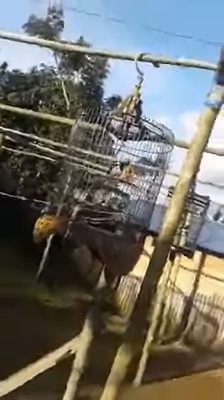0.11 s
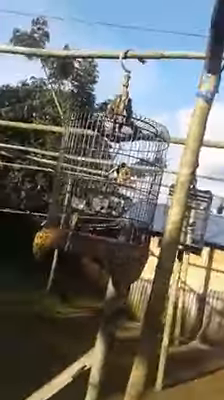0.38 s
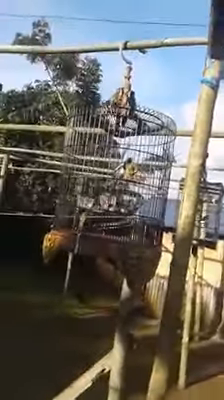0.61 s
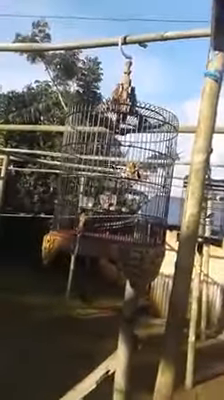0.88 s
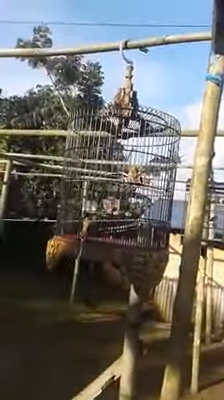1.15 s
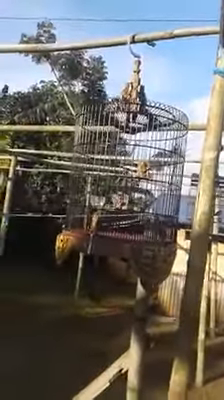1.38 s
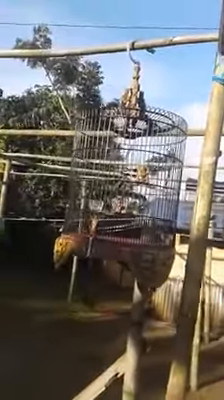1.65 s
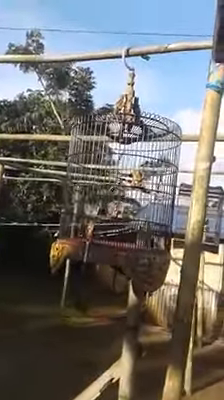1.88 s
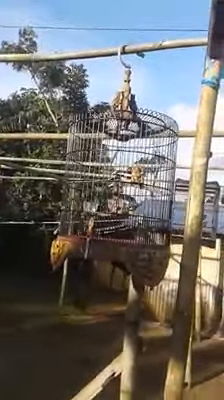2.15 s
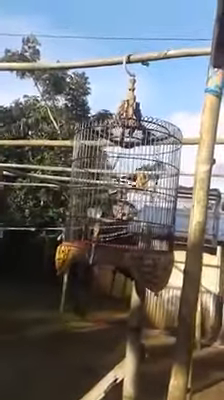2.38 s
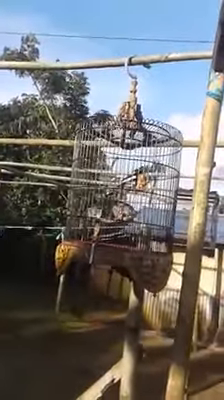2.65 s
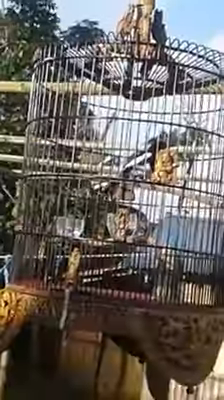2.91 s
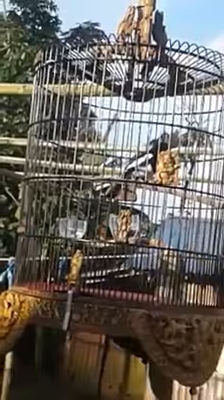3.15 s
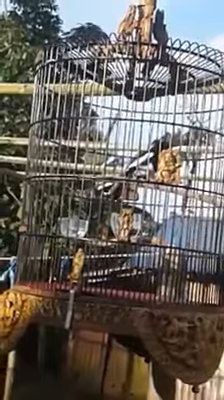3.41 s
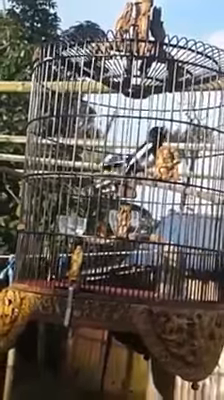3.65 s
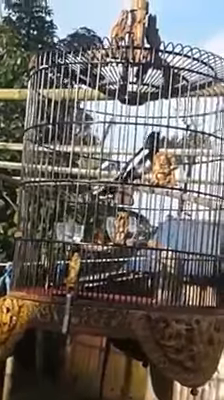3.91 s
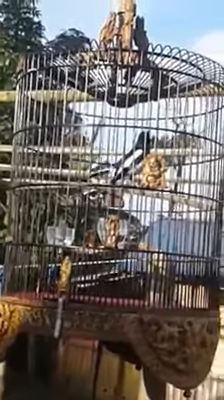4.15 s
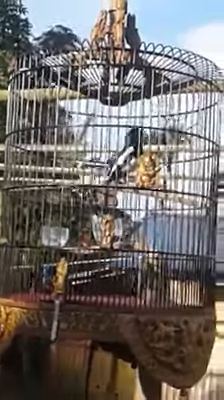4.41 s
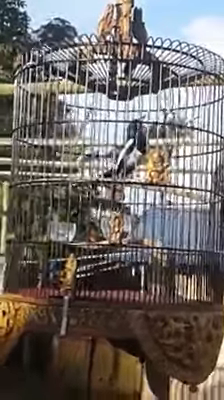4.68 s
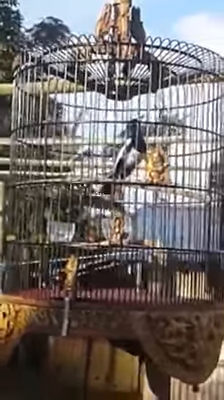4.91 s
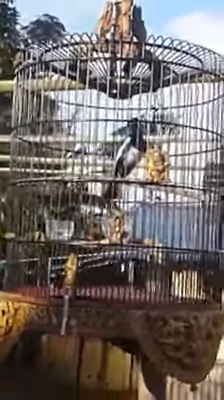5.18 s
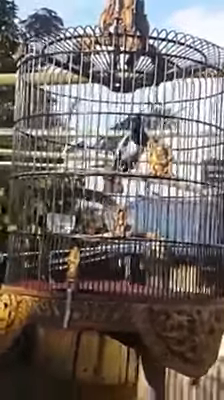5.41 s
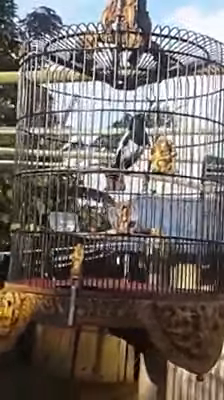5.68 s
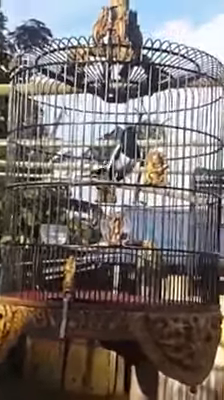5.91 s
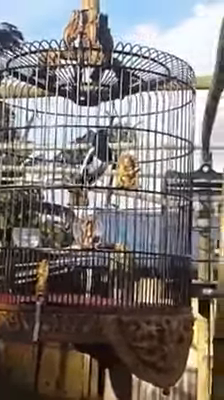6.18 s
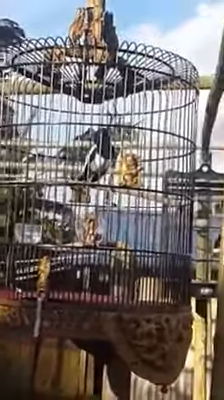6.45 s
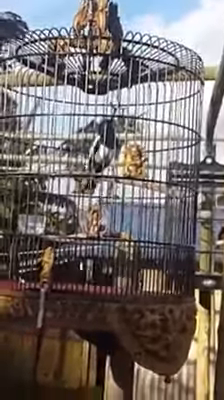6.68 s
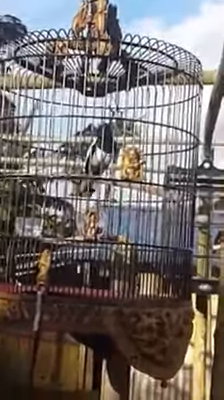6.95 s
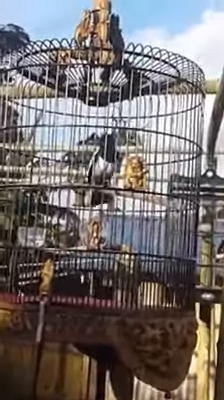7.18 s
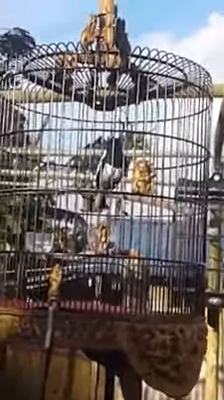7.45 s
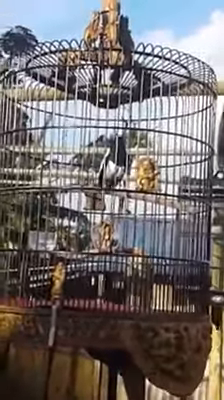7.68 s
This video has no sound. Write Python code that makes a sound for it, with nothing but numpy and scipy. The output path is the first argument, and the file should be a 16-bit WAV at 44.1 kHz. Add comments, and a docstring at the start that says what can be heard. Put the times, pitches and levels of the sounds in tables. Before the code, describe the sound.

Close outdoor phone sound of one bird in a hanging cage, singing clear, bending whistles mixed with hoarse scrapes and short trills. It begins with a brief noisy chirp and rather softer phrases, then becomes brighter and more forceful. Nearby posts and fences return a short diffuse echo. Faint wing flutter, cage ticks and far motor drones sit underneath; a few low engine puffs close it. Mono, with grainy, artificial-sounding highs.

```python
"""In a yard whose fences throw the song back, a caged songbird whistles fast slurs, often two notes at once.
The song is built of gliding sines with weak overtones and rasping air; filtered noise makes the wings'
rustles and the traffic's hum, decaying bursts make the cage's ticks and a small engine's putter at the end.
A phone hears it in mono and rebuilds its treble from shifted copies of the lower band and noise."""
import sys
import numpy as np
from scipy import signal
from scipy.fft import rfft, irfft
from scipy.io import wavfile
from scipy.ndimage import uniform_filter1d, minimum_filter1d, map_coordinates

SR = 44100
rng = np.random.default_rng(int(sys.argv[2]) if len(sys.argv) > 2 else 0)


def dump_mix(stems):
    """Bounce the given channels to the path in sys.argv[1] as a 16-bit WAV at rate SR."""
    frames = np.atleast_2d(stems).T  # one column per channel
    limited = np.clip(frames, -1, 1)  # hard clip at full scale
    pcm = np.round(limited * 32767).astype(np.int16)
    wavfile.write(sys.argv[1], SR, pcm)


def ratio_of_db(decibels):
    """Turn decibels (scalar or array-like) into linear amplitude factors; 0 dB maps to 1."""
    return 10 ** (np.asarray(decibels, float) / 20)


N = 344862  # samples

# spectral shape of turbulent air, in the rasp of the voice, wing rustles and claw cracks:
# (f/Hz, relative level per Hz/dB)
AIR_SPECTRUM = [(1200, -27), (2000, -6), (4000, 14.5), (6000, 9.5), (8000, -16.5), (11000, 8),
                (13000, -21.5), (15500, -11)]


def unit(x):
    """Normalisation by mean power: the rms becomes 1."""
    return x / np.sqrt(np.mean(x ** 2) + 1e-20)


def along(points, hz):
    """Interpolation on a logarithmic frequency axis, through (f/Hz, value) points."""
    f, value = np.transpose(points)
    return np.interp(np.log(hz + 1), np.log(f + 1), value)


def wobble(rate):
    """Band-limited random modulation: a smooth curve through `rate` random knots a second."""
    knots = rng.standard_normal(int(N * rate / SR) + 4)
    return map_coordinates(knots, [np.arange(N) * rate / SR])


def noise(spectrum):
    """Spectral shaping: white noise weighted in frequency, at rms 1."""
    hz = np.fft.rfftfreq(N, 1 / SR)
    white = rfft(rng.standard_normal(N))
    return unit(irfft(white * ratio_of_db(along(spectrum, hz)), N))


def add(track, s, sound):
    """Superposition: the sound joins the track at time s, cut at the track's end."""
    part = track[round(s * SR):][:len(sound)]
    part += sound[:len(part)]


def bird():
    """Source superposition: song, flicks and a farther bird's notes, fluttering a little in strength."""
    # whistled notes, with a rough high hiss near 7.8 kHz and a short noisy start near 5 kHz:
    # (voice, [(t/s, f/Hz, level before flutter/dB), ..])
    song_parts = [ ("reedy", [(0, 2950, -25), (.1, 2900, -43)]), ("airy", [(0, 5000, -12.5),
                  (.05, 4700, -56)]), ("bright", [(.168, 1670, -42), (.2, 2170, -40), (.215, 2180, -31),
                  (.26, 2220, -33), (.319, 2180, -45)]), ("clear", [(.178, 3000, -30), (.192, 2786, -21),
                  (.205, 2810, -24), (.215, 2800, -43), (.272, 2740, -37)]), ("airy", [(.24, 1950, -29),
                  (.262, 1410, -47)]), ("airy", [(.311, 2710, -28.5), (.333, 3170, -29.5)]),
                  ("bright", [(.325, 2650, -28), (.353, 2440, -24.5), (.429, 2440, -72)]),
                  ("airy", [(.507, 3060, -43), (.621, 3380, -30), (.68, 3350, -27.5), (.73, 3330, -53),
                  (.762, 3330, -35.5), (.785, 3350, -57)]), ("airy", [(.812, 3790, -24),
                  (.834, 3400, -31.5), (.876, 3110, -30), (.93, 3080, -26.5), (1.04, 3050, -44)]),
                  ("clear", [(1.062, 3780, -35.5), (1.095, 3850, -26.5), (1.19, 3766, -28.5),
                  (1.219, 3740, -20)]), ("rough", [(1.215, 3760, -21), (1.259, 4150, -24.5),
                  (1.317, 4420, -26.5), (1.439, 4400, -41)]), ("clear", [(1.485, 3050, -34.5),
                  (1.539, 3530, -14.5), (1.572, 3620, -27), (1.658, 3590, -31.5)]),
                  ("rough", [(1.59, 2960, -24), (1.656, 2450, -26.5), (1.698, 2440, -38)]),
                  ("airy", [(1.866, 2690, -32), (1.9, 2720, -27), (1.932, 2720, -28), (1.958, 3010, -20),
                  (1.98, 3200, -29), (2.03, 3385, -19), (2.075, 3380, -28.5), (2.199, 3320, -37)]),
                  ("bright", [(2.055, 1820, -48), (2.085, 2200, -27), (2.199, 2450, -27.5),
                  (2.311, 2380, -29.5), (2.462, 2090, -30), (2.53, 2020, -28.5), (2.548, 2000, -58)]),
                  ("clear", [(2.217, 2770, -27.5), (2.243, 3010, -20), (2.27, 3013, -26.5),
                  (2.31, 2970, -44), (2.36, 2940, -27), (2.44, 2920, -38), (2.55, 2896, -36.5),
                  (2.7, 2900, -26)]), ("clear", [(2.616, 2150, -37), (2.645, 2180, -22), (2.672, 2180, -26),
                  (2.702, 1880, -42), (2.735, 2150, -28.5), (2.765, 2180, -24.5), (2.82, 2200, -54)]),
                  ("airy", [(2.722, 4270, -27.5), (2.754, 3540, -21), (2.798, 3360, -18.5),
                  (2.863, 2900, -26.5), (2.885, 2330, -24.5), (2.949, 2390, -39)]),
                  ("clear", [(2.775, 1326, -55), (2.85, 1274, -50)]), ("harsh", [(2.87, 3120, -12),
                  (2.89, 2800, -30.5), (2.93, 2980, -29)]), ("rough", [(2.985, 3970, -29),
                  (3.003, 3240, -19), (3.035, 2460, -21.5), (3.075, 2360, -16), (3.119, 2390, -35)]),
                  ("hoarse", [(3.011, 3080, -31), (3.04, 3300, -26), (3.055, 3340, -36),
                  (3.11, 3260, -31.5)]), ("clear", [(3.07, 1300, -59), (3.15, 1300, -49)]),
                  ("clear", [(3.08, 955, -55), (3.14, 938, -48)]), ("rough", [(3.197, 2950, -14),
                  (3.213, 2470, -28.5), (3.283, 2130, -23), (3.312, 1740, -37), (3.36, 1384, -44),
                  (3.46, 960, -62)]), ("rough", [(3.24, 2450, -34), (3.265, 2655, -25),
                  (3.295, 2526, -24)]), ("hoarse", [(3.625, 3500, -48), (3.65, 3390, -21),
                  (3.67, 3310, -17.5), (3.696, 3060, -11), (3.74, 2777, -15.5), (3.77, 2450, -33),
                  (3.78, 2360, -44)]), ("harsh", [(3.646, 2110, -31.5), (3.769, 2440, -29)]),
                  ("rough", [(3.66, 4250, -32), (3.7, 3990, -24.5), (3.779, 3780, -25)]),
                  ("clear", [(3.851, 3160, -18), (3.867, 3180, -13.5), (3.895, 3270, -24),
                  (3.922, 3300, -9), (3.96, 3300, -16), (3.989, 3300, -30.5)]),
                  ("clear", [(4.031, 3300, -39), (4.06, 3100, -33), (4.17, 3105, -31.5), (4.212, 3210, -15),
                  (4.298, 3290, -36)]), ("clear", [(4.27, 4250, -42), (4.33, 4260, -22),
                  (4.46, 4330, -28)]), ("airy", [(4.452, 1800, -44), (4.49, 2300, -26.5),
                  (4.522, 2180, -31), (4.56, 2260, -21.5)]), ("hoarse", [(4.462, 3130, -25.5),
                  (4.485, 3290, -16.5), (4.53, 2940, -10.5), (4.584, 2730, -17.5), (4.62, 2530, -32)]),
                  ("rough", [(4.465, 4260, -27.5), (4.53, 4000, -24), (4.58, 4270, -31),
                  (4.63, 4030, -30.5)]), ("clear", [(4.572, 3710, -24), (4.6, 3720, -19),
                  (4.64, 3775, -23.5), (4.723, 3720, -16), (4.76, 3700, -29), (4.879, 3700, -60)]),
                  ("bright", [(4.785, 2590, -43.5), (4.805, 2750, -16.5), (4.849, 3030, -15.5),
                  (4.93, 3407, -14), (4.995, 3610, -14), (5.059, 3630, -14.5)]),
                  ("bright", [(4.9, 2300, -36), (4.935, 2454, -21.5), (5.007, 2660, -17),
                  (5.076, 2677, -23.5), (5.12, 2740, -38.5), (5.145, 2766, -20.5), (5.184, 2870, -21.5),
                  (5.218, 2730, -19), (5.238, 2390, -17)]), ("rough", [(5.1, 3010, -50), (5.132, 3310, -19),
                  (5.168, 3360, -44)]), ("bright", [(5.15, 3630, -48), (5.18, 3930, -25),
                  (5.246, 3960, -10.5), (5.272, 3940, -15.5), (5.31, 3330, -13), (5.35, 3120, -16),
                  (5.4, 3000, -32)]), ("bright", [(5.312, 2500, -71), (5.375, 2560, -21.5),
                  (5.43, 2550, -27)]), ("clear", [(5.436, 3010, -28), (5.45, 2520, -19),
                  (5.519, 2250, -25.5), (5.569, 2110, -28.5)]), ("clear", [(5.501, 2740, -19.5),
                  (5.571, 2780, -9), (5.599, 2770, -9.5)]), ("reedy", [(5.681, 2750, -48),
                  (5.705, 2770, -23), (5.8, 2820, -16.5), (5.92, 2770, -15.5), (5.96, 2750, -21),
                  (6.048, 2700, -26.5)]), ("rough", [(5.85, 7700, -47), (5.99, 7940, -28), (6.1, 7420, -44),
                  (6.185, 7970, -27.5)]), ("harsh", [(6.015, 5100, -14), (6.036, 4400, -22),
                  (6.048, 3677, -2.5), (6.064, 3050, -10.5), (6.098, 2760, -22.5), (6.15, 2490, -27),
                  (6.2, 1820, -31)]), ("rough", [(6.03, 5200, -26), (6.06, 3880, -27), (6.1, 3300, -24.5),
                  (6.16, 2970, -40)]), ("buzzy", [(6.338, 870, -61.5), (6.354, 918, -43), (6.372, 955, -50),
                  (6.399, 884, -68)]), ("bright", [(6.525, 2040, -38), (6.551, 2270, -21),
                  (6.579, 2480, -16.5), (6.61, 2420, -47), (6.679, 2470, -42)]),
                  ("airy", [(6.687, 2650, -20), (6.703, 2770, -17), (6.747, 3070, -19),
                  (6.765, 3530, -19.5)]), ("airy", [(6.701, 4040, -34.5), (6.733, 4190, -33.5),
                  (6.769, 4200, -20.5)]), ("bright", [(6.777, 4080, -6.5), (6.896, 3980, -11.5),
                  (6.94, 4040, -13), (6.968, 4058, -8.5), (6.985, 4190, -14.5), (7.02, 4370, -14),
                  (7.078, 4430, -28), (7.1, 4400, -58)]), ("shrill", [(7.175, 4650, -29.5),
                  (7.202, 5340, -22.5), (7.224, 5940, -14.5), (7.26, 6150, -28)]),
                  ("shrill", [(7.222, 4690, -23), (7.254, 4640, -13), (7.273, 3570, -17.5),
                  (7.298, 3510, -26), (7.335, 3500, -38)]), ("harsh", [(7.25, 3030, -32),
                  (7.275, 2400, -33.5), (7.325, 2400, -41)]), ("hoarse", [(7.336, 1914, -26),
                  (7.35, 3480, -20), (7.36, 3585, -19), (7.375, 3550, -18), (7.405, 3548, -30),
                  (7.44, 3500, -56)]), ("harsh", [(7.34, 2624, -43), (7.37, 2770, -22.5),
                  (7.42, 2960, -58)]), ("shrill", [(7.455, 2050, -26.5), (7.47, 3885, -18.5),
                  (7.478, 4450, -13.5), (7.491, 3590, -15.5), (7.523, 3270, -25)]),
                  ("reedy", [(7.523, 3120, -20), (7.55, 2723, -25), (7.595, 2800, -21),
                  (7.622, 2800, -48)]), ]
    # two long notes of a farther bird: [(t/s, f/Hz, level before flutter/dB), ..]
    far_notes = [
        [(0, 2042, -49), (.17, 2026, -53)],
        [(.052, 1362, -53), (.2, 1357, -46), (.23, 1323, -51), (.4, 1310, -52)],
    ]
    # a short up-and-down flick: (t from its start/s, f/Hz)
    flick_path = [(0, 2884), (.014, 2981), (0.022, 3154), (.032, 2947), (0.046, 2816)]
    # its three renderings: (t/s, level before flutter/dB)
    flick_starts = [(2.367, -25.5), (2.461, -22.5), (2.592, -24.5)]
    # voice: (octave overtone/dB, third partial/dB, rasp/dB, all re the gliding sine; roughness, limited to 0-1)
    voices = {"clear": (-47.5, -51, -52.5, 0.26), "bright": (-31, -39.5, -60.5, 0.18),
              "reedy": (-5.5, -34, -25, 0.05), "airy": (-34.5, -44, -30, 0.43),
              "rough": (-32.5, -46.5, -28, 1.9), "harsh": (-19, -36.5, -14.5, .4),
              "hoarse": (-29.5, -42, -18, 0.3), "shrill": (-18.5, -36.5, -11, 0.34),
              "buzzy": (15, 15, 8, 0.7)}

    # the membrane's unsteadiness comes in bursts some 10 ms long
    tremor = (wobble(350) + 1j * wobble(350)) * ratio_of_db(2.5 * wobble(120))
    tremor /= np.sqrt(np.mean(np.abs(tremor) ** 2))
    breath = unit(noise(AIR_SPECTRUM) * ratio_of_db(5 * wobble(120)))
    swing, pulsing = warble()

    parts = list(song_parts)
    for start, db in flick_starts:
        parts.append(("clear", [(start + s, hz, db) for s, hz in flick_path]))
    parts += [("clear", far) for far in far_notes]

    song = np.zeros(N)
    for voice, path in parts:
        add(song, path[0][0], glide(path, *voices[voice], breath, tremor, swing))
    return song * pulsing * ratio_of_db(1.3 * wobble(70))


def glide(path, octave_db, upper_db, rasp_db, rough, breath, tremor, swing):
    """Harmonic synthesis: a gliding sine and overtones, smeared by an unsteady membrane, with rasping air."""
    fall_db = 5  # from each partial above the third to the next
    attack_s, release_s = 0.0048, 0.0028
    s, hz, db = np.transpose(path)
    t = np.arange(s[0], s[-1], 1 / SR)
    span = slice(round(s[0] * SR), round(s[0] * SR) + len(t))

    pitch = uniform_filter1d(np.interp(t, s, hz), size=200, mode="nearest") + swing[span]
    spin = np.exp(2j * np.pi * np.cumsum(pitch) / SR)
    upper = 0
    for k in range(3):
        audible = (k + 3) * pitch < SR / 2.5  # keeps partials clear of aliasing
        upper = upper + ratio_of_db(-fall_db * k) * spin ** (k + 3) * audible
    tone = spin + ratio_of_db(octave_db) * spin ** 2 + ratio_of_db(upper_db) * upper

    rough = np.clip(rough, 0, 1)
    membrane = np.sqrt(1 - rough ** 2) + rough * tremor[span]
    voiced = np.sqrt(2) * np.imag(tone * membrane)

    # a sound that starts at time 0 is already under way, so it has no attack
    attack = (t - s[0] + (s[0] == 0)) / attack_s
    edges = np.clip(np.minimum(attack, (s[-1] - t) / release_s), 0, 1)
    return ratio_of_db(np.interp(t, s, db)) * edges * (voiced + ratio_of_db(rasp_db) * breath[span])


def warble():
    """Joint frequency and amplitude modulation by the syrinx: strength dips once a swing, more when it is wide."""
    # stretches of warbling: (start t/s, end t/s, mean rate f/Hz, pitch swing/Hz)
    warbles = [(2.33, 2.415, 50.4, 60), (2.86, 2.918, 72.3, 120), (3.037, 3.114, 54, 138),
               (3.236, 3.3, 55, 90.5), (3.695, 3.768, 46.7, 148), (4.524, 4.607, 49.7, 81),
               (5.11, 5.211, 50, 107), (5.276, 5.367, 59.7, 233), (5.381, 5.488, 50.3, 91),
               (6.065, 6.115, 69.7, 122.5), (7.262, 7.303, 76.8, 110), (7.482, 7.544, 62.3, 88)]
    swing, gain = np.zeros(N), np.ones(N)
    unsteady = 1 + 0.22 * wobble(40)
    for start, end, rate_hz, swing_hz in warbles:
        span = slice(round(start * SR), round(end * SR))
        turn = 2 * np.pi * np.cumsum(rate_hz * unsteady[span]) / SR
        fade = signal.windows.tukey(len(turn), .3)
        swing[span] = swing_hz * fade * np.sin(turn)
        gain[span] = 1 + np.minimum(swing_hz / 350, .9) * fade * np.cos(turn)
    return swing, gain


def cage():
    """Friction and impact: wing rustles swell and die as noise; claw ticks are cracks with a knock of the wood."""
    # wing rustles: (t/s, length/s, peak level before flutter/dB)
    rustles = [(0, 0.02, -27.5), (1.673, 0.091, -32), (1.748, 0.14, -36), (1.854, 0.11, -34),
               (2.126, 0.32, -51.5)]
    # claw ticks: (t/s, crack level before a 10 dB lift/dB, initial knock level/dB)
    claw_ticks = [(0.3735, -39, -42), (2.6314, -44, -32), (3.4715, -42.5, -55), (4.0194, -41, -51),
                  (6.047, -59, -55), (7.049, -28, -41)]
    swell, ticks = np.zeros(N), np.zeros(N)
    for s, length, db in rustles:
        add(swell, s, ratio_of_db(db) * np.hanning(round(length * SR)) ** 1.1)
    rustling = swell * noise(AIR_SPECTRUM) * ratio_of_db(1.73 * wobble(150))

    t = np.arange(SR // 20) / SR
    air = noise(AIR_SPECTRUM)
    for s, db, knock_db in claw_ticks:
        # the divisors are the times to fall by 60 dB, in s
        knock = ratio_of_db(knock_db - 60 * t / 0.021) * np.sin(2 * np.pi * 700 * t)
        crack = ratio_of_db(db + 10 - 60 * t / 0.0028) * air[round(s * SR):][:len(t)]
        add(ticks, s, crack + knock)
    return rustling + ticks


def posts(near):
    """Specular reflection: delayed copies off nearby posts and walls, each repeating the earlier ones too."""
    # reflections: (delay t/s, level re the sound so far/dB)
    reflections = [(.007, -12), (.016, -14), (.027, -24), (.041, -22), (.058, -37.5)]
    for delay, db in reflections:
        add(near, delay, ratio_of_db(db) * near.copy())
    return near


def fences(x):
    """Diffuse reverberation: decaying noise tails; the paths drift, so three tails are cross-faded in time."""
    # ringing of the yard: (f/Hz, time to fall by 60 dB/s)
    ringing = [(500, 0.2), (2000, 0.4), (4000, 0.3), (5500, 0.23), (9000, 0.28)]
    hz, t, z = signal.stft(rng.standard_normal((3, SR // 2)), SR, nperseg=256)
    decay = ratio_of_db(-60 * t / along(ringing, hz)[:, None])
    tails = signal.istft(z * decay, SR, nperseg=256)[1]
    tails = tails / np.linalg.norm(tails[0])

    # the squared shares always sum to 1
    turn = 2 * np.pi * np.arange(N) / SR * 1.3
    shares = np.sqrt(2 / 3) * np.abs(np.cos(turn + np.pi / 3 * np.arange(3)[:, None]))
    late = np.pad(x * shares, ((0, 0), (400, 0)))  # a 9 ms delay
    return signal.fftconvolve(late, tails, axes=1).sum(axis=0)[:N]


def engine():
    """Damped oscillation: each exhaust puff of a small engine is a decaying sine, higher when stronger."""
    # puffs: (t/s, initial level/dB)
    puffs = [(7.607, -40), (7.644, -31), (7.682, -24.5), (7.714, -22.5), (7.724, -15.5), (7.76, -40),
             (7.793, -22)]
    base_hz, hz_per_db = 196, 2  # pitch of a 0 dB puff, and its fall as the puff weakens
    putter, t = np.zeros(N), np.arange(SR // 20) / SR
    for s, db in puffs:
        tone = np.sin(2 * np.pi * (base_hz + hz_per_db * db) * t)
        add(putter, s, ratio_of_db(db - 60 * t / 0.053) * tone)
    return putter


def traffic():
    """Broadband and tonal radiation: far road noise, and faint wavering drones of far motors."""
    # road noise of the yard: (f/Hz, relative level per Hz/dB)
    road_spectrum = [(25, -44), (45, -15), (62, 7), (90, 6.5), (180, 2.5), (330, -4), (900, -10.5),
                     (1300, -13), (2100, -13.5), (2500, -8.5), (3400, -9), (6000, -30.5), (9600, -21),
                     (15400, -35)]
    # its strength: (t/s, level before wavering/dB)
    road_level = [(0, -45), (.7, -48.5), (1.6, -42.5), (3.5, -44.5), (5.2, -45), (6.3, -42.5), (6.9, -45),
                  (7.82, -40.5)]
    # drones that swell and fade: (start t/s, end t/s, mean f/Hz, peak level before wavering/dB)
    drones = [(0, .9, 316, -54.5), (1.0, 2.602, 311.6, -48), (2.001, 2.6, 204, -45),
              (2.5, 4.892, 208, -50.5), (5.4, 7.4, 204, -44)]
    s, level = np.transpose(road_level)
    level_db = np.interp(np.arange(N) / SR, s, level) + 1.0 * wobble(5)
    rumble = ratio_of_db(level_db) * noise(road_spectrum)
    for start, end, hz, db in drones:
        length = round((end - start) * SR)
        phase = 2 * np.pi * np.cumsum(hz + 1.5 * wobble(3)) / SR
        drone = ratio_of_db(db + 4.3 * wobble(8.06)) * np.sin(phase)
        add(rumble, start, drone[:length] * np.hanning(length))
    return rumble


def scene():
    """Superposition of direct sound, echoes and background, alike on both channels."""
    near = posts(bird() + cage())
    return np.tile(near + ratio_of_db(-7.0) * fences(near) + engine() + traffic(), (2, 1))


def limiter(x):
    """Peak limiting: a smoothed gain reduction keeps peaks below 0.95 of full scale."""
    needed = np.minimum(1, .95 / (np.abs(x) + 1e-9))
    held = minimum_filter1d(needed, size=401)
    return x * uniform_filter1d(held, size=201)


def band_level(z, edges, size):
    """Short-time power averaging: each band's rms over `size` frames, spread over the band's bins."""
    width = np.diff(edges, append=len(z))
    power = np.add.reduceat(np.abs(z) ** 2, edges, axis=0) / width[:, None]
    power = np.abs(uniform_filter1d(power, size=size, axis=1))
    return np.repeat(np.sqrt(power), width, axis=0)


def rebuilt_treble(x):
    """Spectral band replication: the treble keeps its coarse level, filled with the shifted lower band and noise."""
    # edges of the bands whose level is kept: f/Hz
    band_edges = [4600, 5200, 6200, 7300, 8350, 9500, 10600, 11900, 13100, 14300, 15500]
    copy_hz = 3750  # the width of the copied stretch, and its step upward
    mask_db, mask_hz = -30, 3300
    boost_db, hiss = 8, 0.94  # gain cap over the median; noise amplitude re the band level

    hz, t, z = signal.stft(x, SR, nperseg=588, noverlap=441)
    edges = np.searchsorted(hz, [0, *band_edges])
    split, step = edges[1], round(copy_hz / hz[1])
    wanted = band_level(z, edges, size=4)

    # faint bands beside a loud note are masked by it and dropped
    narrow = band_level(z, np.arange(0, len(hz), step=3), size=8)
    heard = narrow > ratio_of_db(mask_db) * narrow.max(axis=0)
    z = z * (heard | (hz < mask_hz)[:, None])

    source = split - step + (np.arange(len(hz)) - split) % step
    copy = z[source] * np.exp(2j * np.pi * np.outer(hz - hz[source], t))
    # sharp lines of the copy are partly levelled, so they come back blurred
    copy /= (narrow[source] + 1e-9) ** .4

    gain = wanted / (band_level(copy, edges, size=4) + 1e-9)
    # the gain is capped, so empty parts of the copy stay holes
    ceiling = ratio_of_db(boost_db) * np.median(gain[split:edges[-1]], axis=0)
    hissing = hiss * wanted * np.exp(2j * np.pi * rng.random(z.shape))
    filled = copy * np.minimum(gain, ceiling) + hissing
    z[split:] = filled[split:]
    z[hz > band_edges[-1]] = 0
    return signal.istft(z, SR, nperseg=588, noverlap=441)[1][:N]


def thin_tone():
    """A nearly pure tone: one steady pitch rings on in the treble and fades."""
    # its course: (t/s, f/Hz, level/dB)
    tone_path = [(5.981, 5440, -25.5), (6.022, 5440, -29), (6.15, 5440, -32), (6.3, 5440, -72)]
    thin, still = np.zeros(N), np.zeros(N)
    add(thin, tone_path[0][0], glide(tone_path, -80, -80, -80, 0, still, still, still))
    return thin


def top_cut(x):
    """Nothing passes above the cut-off."""
    return signal.sosfilt(signal.butter(12, 15570, fs=SR, output="sos"), x)


def record(dry):
    """Monophonic pickup by a phone: limited sound with rebuilt treble and a thin tone, on two like channels."""
    mono = rebuilt_treble(limiter(dry[0])) + thin_tone()
    return top_cut(np.tile(mono, (2, 1)))


dry = scene()
out = record(dry)
dump_mix(out)
```